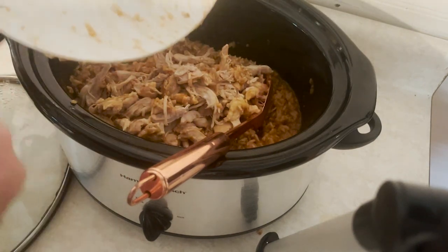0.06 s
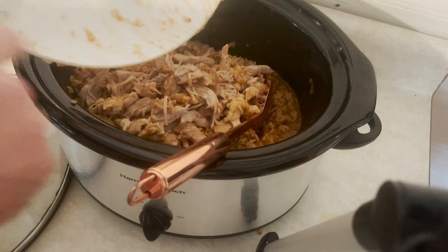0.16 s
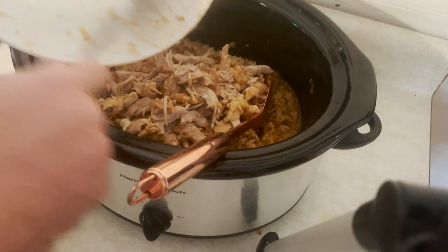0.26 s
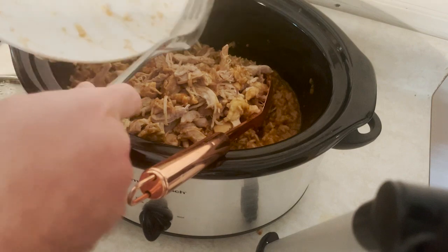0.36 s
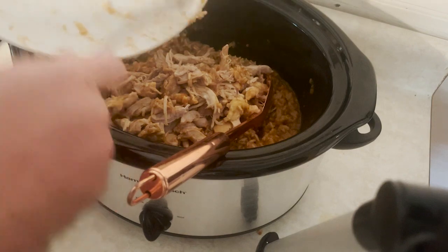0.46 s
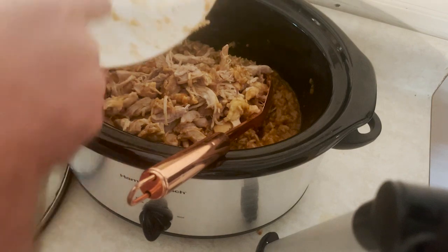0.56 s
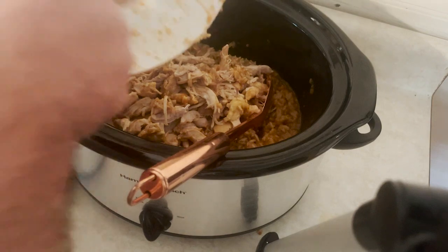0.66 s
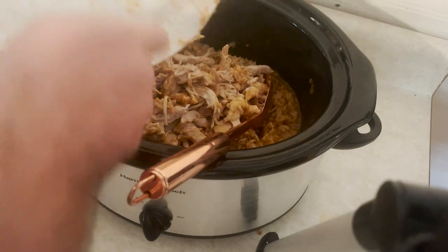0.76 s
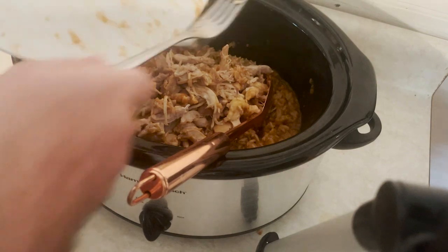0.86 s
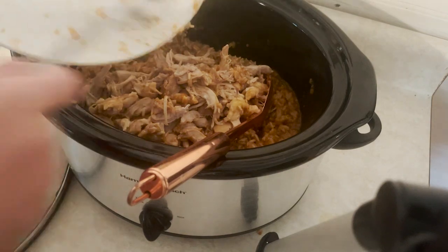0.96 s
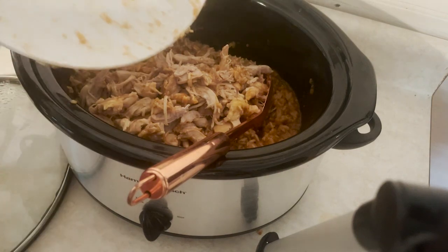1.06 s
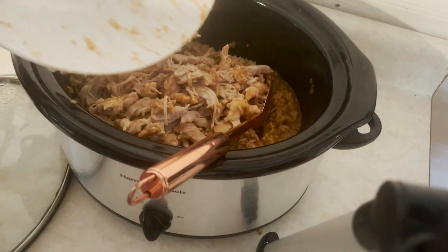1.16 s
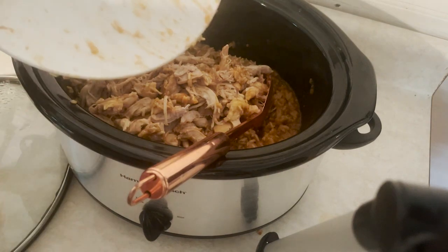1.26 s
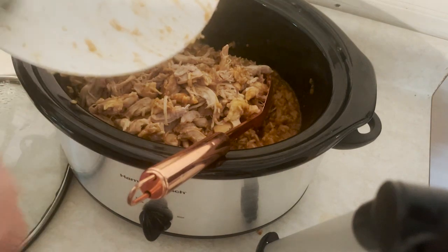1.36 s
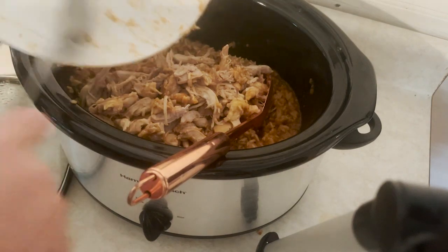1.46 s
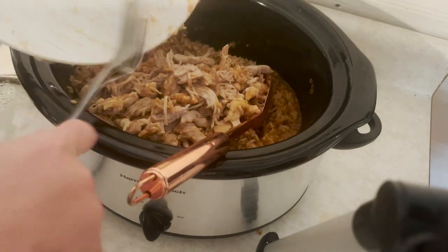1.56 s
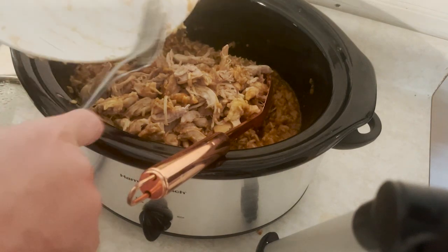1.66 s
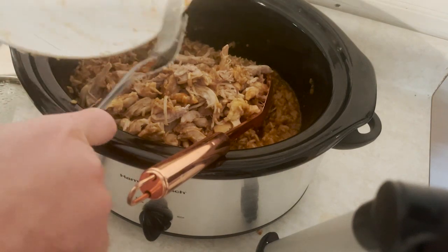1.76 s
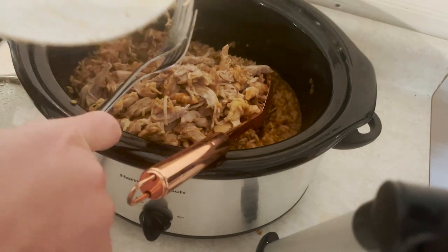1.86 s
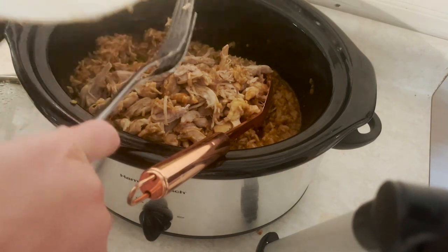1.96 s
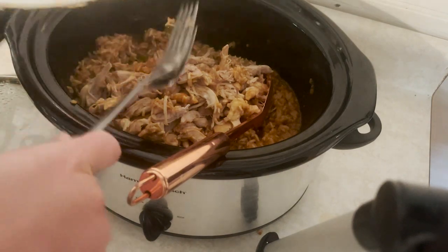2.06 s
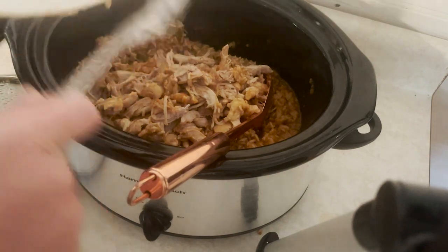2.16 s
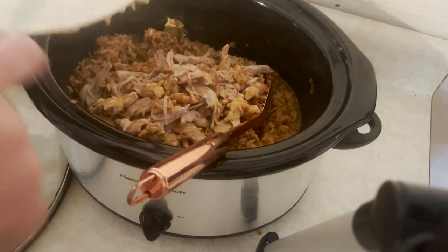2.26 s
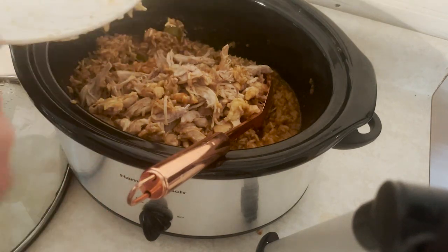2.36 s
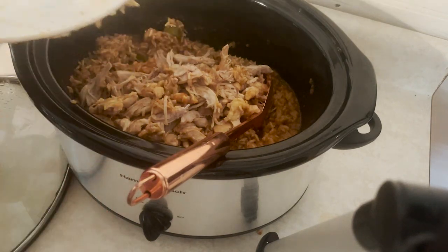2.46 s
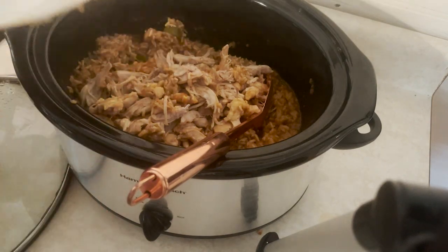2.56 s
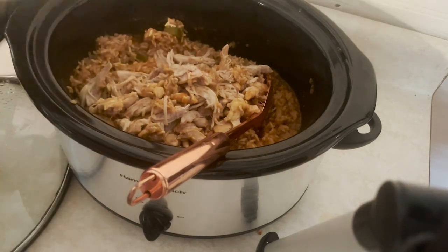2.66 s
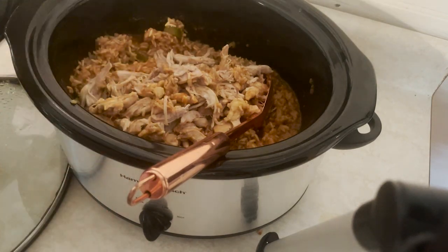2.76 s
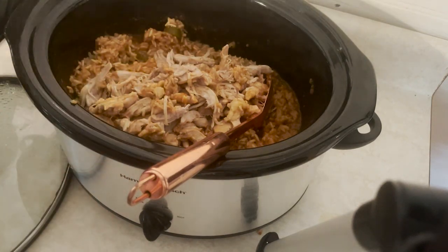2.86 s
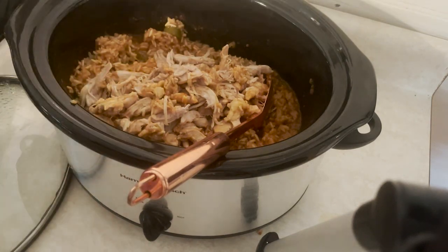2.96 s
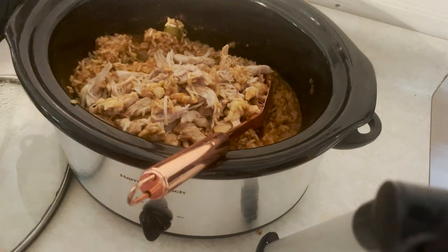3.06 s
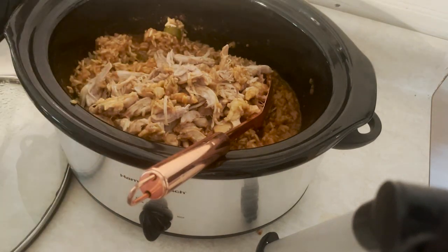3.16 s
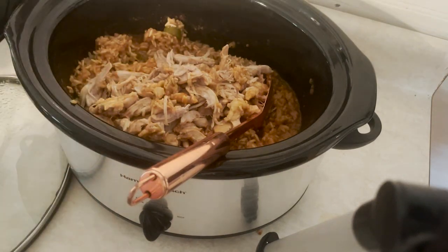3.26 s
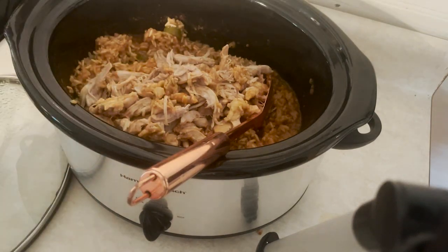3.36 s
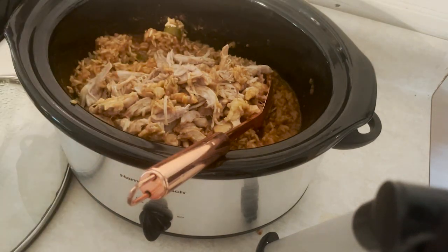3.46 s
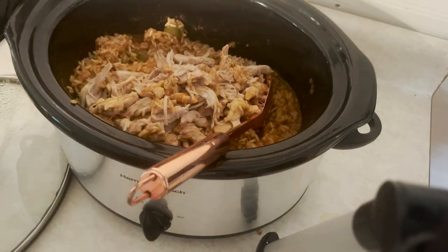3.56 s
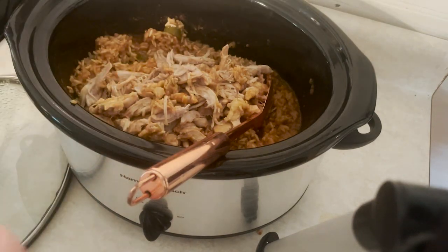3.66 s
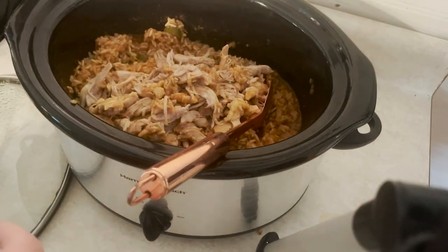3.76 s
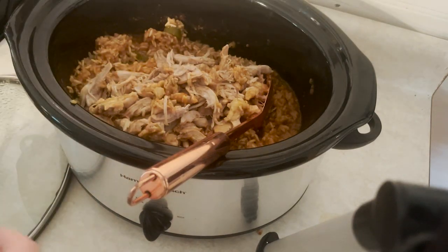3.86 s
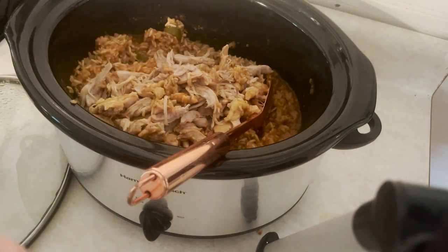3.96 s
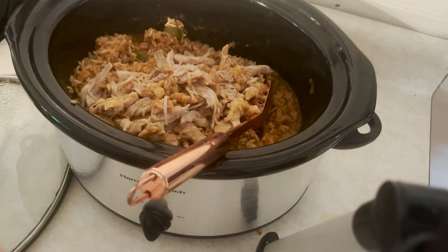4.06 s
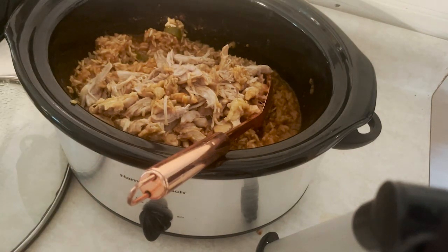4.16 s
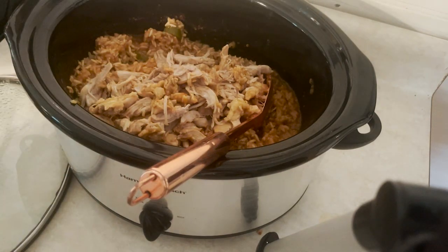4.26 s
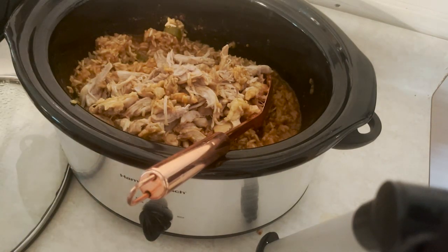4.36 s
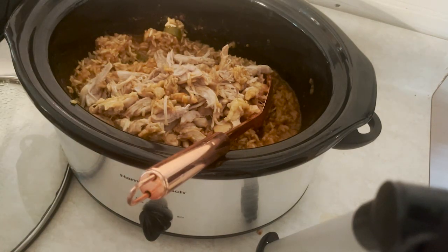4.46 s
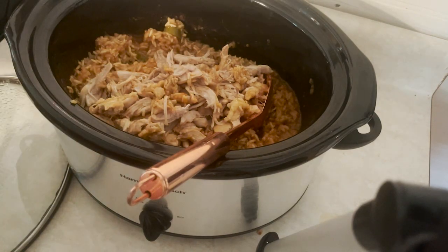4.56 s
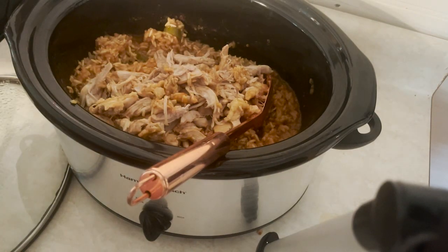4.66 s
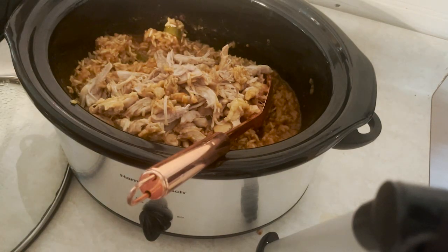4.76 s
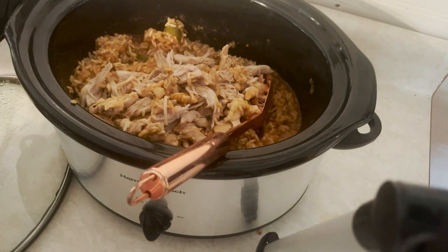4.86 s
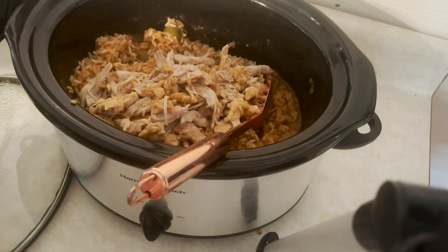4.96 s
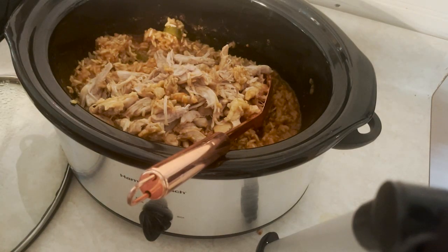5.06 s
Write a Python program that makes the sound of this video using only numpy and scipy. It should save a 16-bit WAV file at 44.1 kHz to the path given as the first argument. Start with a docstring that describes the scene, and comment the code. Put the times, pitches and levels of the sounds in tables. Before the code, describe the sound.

Close stereo pickup in a hard-walled kitchen: a metal spoon strikes and scrapes a ceramic plate in sharp, quickly damped clinks, busiest in the first two seconds, with faint squeaks near two seconds. A few more firm clinks follow around three seconds, then only light, dull ticks and soft rubbing toward the end. A low appliance hum and faint room air continue throughout.

```python
"""Sharp ceramic clinks come first: a steel spoon taps, bounces and scrapes on a hand-held plate in a kitchen.
Each tap or slide is shaped noise that sets families of ringing plate tones going, chosen by the spot touched.
A few faint squeaks are gliding tones, and the hard room answers with short tails of dying noise.
Behind it all, filtered noise makes an appliance's hum, room air and a low rumble.
Two microphone ports hear the plate with different loudness and timing."""
import sys
import numpy as np
from scipy import signal
from scipy.fft import rfft, irfft, next_fast_len
from scipy.io import wavfile
from scipy.ndimage import map_coordinates

SR = 44100
rng = np.random.default_rng(int(sys.argv[2]) if len(sys.argv) > 2 else 0)


def store_pcm(level_fs):
    """Save levels as 16-bit WAV."""
    pcm = np.round(np.clip(level_fs, -1, 1) * 32767).astype(np.int16)
    wavfile.write(sys.argv[1], SR, np.atleast_2d(pcm).T)


N = 225473


def amp(db):
    """Turn decibels into a gain."""
    return 10 ** (np.asarray(db) / 20)


def unit(x):
    """Scale to an average strength (rms) of 1."""
    return x / np.sqrt(np.mean(np.abs(x) ** 2) + 1e-30)


def along(points, hz):
    """Read a value at any pitch from (pitch, value) points, spacing pitch by ratio as the ear does."""
    point_hz, value = np.transpose(points)
    return np.interp(np.log(hz + 1), np.log(point_hz + 1), value)


def filtered(x, response):
    """Filter a sound by multiplying its spectrum by a response to each frequency."""
    size = next_fast_len(N + SR // 2)
    hz = np.fft.rfftfreq(size, 1 / SR)
    return irfft(rfft(x, size) * response(hz), size)[..., :N]


def wobble(rate):
    """A smooth random curve through `rate` random points a second."""
    knots = rng.standard_normal(int(N * rate / SR) + 4)
    return map_coordinates(knots, [np.arange(N) * rate / SR])


# Plate tones in eight families, low to high; the shortest-lived are the dull noise of contact.
# Columns: pitch_hz, level_db (within the family), t60_s (time to fade by 60 dB, before added damping)
PLATE_FAMILIES = [
    [(352, 1, 0.026), (143.6, -10.5, 0.044)],
    [(623, -3.5, 0.017), (843, 1, 0.025), (1169, -0.5, 0.021)],
    [(1564, 2, 0.21), (1522, -1, 0.058), (1511, -8.5, 0.23), (1923, -8, 0.044), (1600, 3, 0.0011)],
    [(2403, 6, 0.082), (2371, -3, 0.14), (2419, 5, 0.053), (2035, -9, .04), (2628, -10, 0.21),
     (2189, -0.5, 0.0069)],
    [(3460.4, 4.5, 0.04), (3560, -4.5, 0.1), (3204, -7.5, 0.042), (4060, -9, 0.056), (4620, -7.5, 0.073),
     (3683, 5.5, 0.012)],
    [(4503, 9, 0.047), (4670, 2.5, 0.033), (4878, 8, 0.052), (4740, 8.5, 0.006)],
    [(5090, -4.5, 0.028), (5590, 2.5, 0.022), (6580, -6, 0.071), (6304, -1, 0.048), (6957, -6.5, 0.055),
     (8075, 5, 0.031), (7180, -2, 0.015), (6080, 6.5, 0.005)],
    [(9544, 2.5, 0.01), (10180, -1, 0.011), (10380, -13.5, 0.086), (11303, 0, 0.024), (12070, -7, 0.026),
     (13300, -0.5, 0.017), (14700, 5, 0.0056), (16843, 3.5, 0.005), (10660, 16, 0.0015),
     (14500, 12.5, 0.0017)],
]


def ringing(hz, damping=1):
    """Each family is a sum of fading tones, scaled to energy 1; damping (1 / s) adds to each 1 / t60."""
    s = 2j * np.pi * hz

    def mode(centre_hz, level_db, t60_s):
        decay = np.log(1000) * (1 / t60_s + damping)
        return amp(level_db) * s / ((s + decay) ** 2 + (2 * np.pi * centre_hz) ** 2)

    families = []
    for family in PLATE_FAMILIES:
        # neighbouring tones start in opposite directions
        tones = [(-1) ** k * mode(*row) for k, row in enumerate(family)]
        families.append(unit(sum(tones)))
    return np.array(families)


# How strongly each spot drives the families; rows are spots evenly spaced over 0-1.
# Columns: family_1_db to family_8_db, low to high
SPOT_LEVELS = [(-2.5, -3.5, -7.5, -7, -23.5, -11, 4.5, 2.1), (-1.3, -7, -15.5, 2.5, -10, 1.5, -3, -5.5),
               (-4.5, 5, 0.8, 1.7, -1.7, 0.4, -2, -5), (-14, 1.5, -2, -16, 5.5, -4, 3.2, -7)]


def drive(level_db, thud_db, spot, hardness_db):
    """The touched spot favours some families; thud lifts the lowest two, hardness the top three in steps."""
    spot_places = np.linspace(0, 1, len(SPOT_LEVELS))
    gain_db = []
    for k, family_db in enumerate(np.transpose(SPOT_LEVELS)):
        spot_db = np.interp(spot, spot_places, family_db)
        gain_db.append(level_db + spot_db + thud_db * (k < 2) + hardness_db * max(k - 4, 0))
    return amp(gain_db)


# Single touches of the spoon.
# Columns: start_s, level_db (before the overall force), thud_db (added to the two lowest families),
# spot (0-1), hardness_db (per family above the fifth), chatter_s (time for the contact noise to die down)
SPOON_TAPS = [(0.0495, -13, -8.5, 0.62, 1.58, .0059), (0.11, -29, -29, 1, -1.5, .0038),
              (0.1617, -26, -19, .3, 2, 0.0026), (0.2452, -26.5, -8.5, 0.56, 3.4, .0023),
              (0.2506, -15, -14.5, 0.43, 1.04, .0021), (0.5234, -17.5, -6.5, 0.31, -1, .004),
              (0.5346, -11.5, -13, 0.01, -3.86, .0042), (0.6387, -39.5, -9, 0, 4.5, .0039),
              (0.737, -44, -2.5, 0, 2.6, .0017), (1.1027, -25, -2.5, 0.19, 2.5, .0028),
              (1.1733, -36, -13, 0.5, -4, 0.0033), (1.204, -33.5, -28, 0.2, 5, .0017),
              (1.217, -25.5, -29.5, 0.15, 2, .0075), (1.2322, -29, -4.5, 0.58, 3, .0073),
              (1.6435, -10.5, -7, 0.67, 1.2, .0046), (1.8469, -37, 0.5, 0.67, 4.5, .0017),
              (1.8952, -44.5, 0, 0.67, 7, .0026), (1.934, -35, -22.5, 0.4, 1.7, .005),
              (1.9677, -22, -21, 0.8, 1.5, .005), (1.983, -21, -0.5, 1, -1.5, .0037),
              (1.9944, -21, -10, 0.56, 1.6, .0095), (2.0726, -37.5, -10.5, .65, -9, 0.0045),
              (2.116, -34, -9, 0.2, -4, .005), (2.1352, -27.5, -11, 0.34, -0.5, .013),
              (2.2397, -16, -13.5, 0.84, 3, .0043), (2.9388, -19, -15, 0.68, 1.6, .0042),
              (3.19, -14.5, -18.5, 0.67, -3, 0.005), (3.2098, -28.5, -19.5, 0.99, -1.5, .0055),
              (3.22, -30, -34, 0.93, -3.5, .0035), (3.2417, -27, -4.5, 0.47, -5.5, .008),
              (3.2482, -31, -23, 0.8, -1, .0086), (3.6261, -44, -30, 1, -0.5, .012),
              (3.6413, -40.5, -16, 0.7, -5, 0.0041), (4.066, -50.5, -9.5, 0.66, 1, .0062),
              (4.36, -43, -10, 0.7, -6, .006), (4.3918, -37, -31, 0.37, -6, .0041),
              (4.4614, -34.5, -12, .35, -3, .0056), (4.4875, -39.5, -21, 0.6, -2.5, 0.0042),
              (4.537, -30.5, -17, 0.24, -4.5, .015), (4.561, -27, -15, .35, -10, .0043),
              (4.592, -38, -25, 0.3, -4, 0.0081), (4.61, -32, -30, 0.32, -3.5, .0031),
              (4.6297, -32, -38, 0.62, -2, .0061)]


def taps(force_db):
    """Each contact is a brief burst of chatter that drives the families its spot favours."""
    force = np.zeros((len(PLATE_FAMILIES), N + SR))
    t = np.arange(SR // 10) / SR
    uptake = np.abs(ringing(np.fft.rfftfreq(len(t), 1 / SR))) ** 2
    for start_s, *contact, chatter_s in SPOON_TAPS:
        rise = 1 - np.exp(-t / 0.0012)
        shape = rise * np.exp(-t / max(chatter_s, .0005))
        chatter = shape * rng.standard_normal((len(PLATE_FAMILIES), len(t)))
        # make every family ring with equal energy before the spot sets their balance
        energy = np.mean(uptake * np.abs(rfft(chatter)) ** 2, axis=1, keepdims=True)
        chatter /= np.sqrt(energy)
        place = force[:, round(start_s * SR):][:, :len(t)]
        place += amp(force_db) * drive(*contact)[:, None] * chatter
    return force[:, :N]


# Slides of the spoon. Columns: thud_db (added to the second family; slides leave the lowest one still),
# hardness_db (per family above the fifth), then a curve of time_s, pressure_db (before the overall force), spot
# (0-1)
SPOON_STROKES = [(-12.5, 0, [(.07, -20.5, 0.88), (.146, -57.5, 0.04), (.164, -29, 0), (.194, -37, 0.86),
                 (.23, -32, 0.7)]), (-6.5, -4, [(.56, -39, 0.52), (.624, -45.5, .5), (.674, -38.5, 0.1),
                 (.736, -43.5, .35), (.79, -78, 1)]), (-16, -3.9, [(1.12, -43, 0), (1.182, -41, 0.2),
                 (1.2, -39, 0), (1.214, -18.5, 0.11), (1.24, -24.5, 0.39), (1.28, -38.5, 0.95)]),
                 (-12, -0.64, [(1.84, -35, 0.65), (1.858, -36, 0.45), (1.902, -43.5, 0.82),
                 (1.935, -34.5, 0.63), (1.99, -22.5, 0.46), (2.038, -40.5, 0.82), (2.075, -33.5, 0.62),
                 (2.126, -33, 0.63), (2.19, -43.5, 0.17), (2.23, -35, 0.34)]),
                 (-14.5, -3.5, [(3.195, -13.5, 0.25), (3.221, -12.5, 0.23), (3.232, -19.5, 0.58),
                 (3.244, -19, 0.32), (3.264, -23, 0.53), (3.275, -39, 0.5), (3.31, -32, .6)]),
                 (-19.5, -3.5, [(3.54, -59, 0.7), (3.594, -52.5, 0.66), (3.65, -42.5, 0.85),
                 (3.686, -50.5, 0.54), (3.806, -55.5, 0.73), (3.83, -83, 0.4)]),
                 (-20, -3.5, [(4.055, -70, .6), (4.067, -51.5, 0.49), (4.095, -59.5, 0.64),
                 (4.155, -51.5, 0.5), (4.18, -58.5, 0.68), (4.27, -53, 0.56), (4.32, -50, 0.53),
                 (4.35, -56.5, 0.85), (4.4, -43.5, 0.37), (4.445, -46.5, 0.5), (4.484, -36.5, 0.43),
                 (4.514, -46, 0.52), (4.56, -32.5, 0.23), (4.6, -42.5, 0.64), (4.63, -39, 0.42),
                 (4.688, -42.5, 0.78), (4.78, -63, 0.33)])]


def strokes(force_db, grit_db, stutter_db, flicker_db, slips_per_s, stutters_per_s):
    """The edge catches on the glaze in clumps of uneven slips, too light to knock the lowest family."""
    t = np.arange(N) / SR
    pressure = np.zeros((len(PLATE_FAMILIES), N))
    for thud_db, hardness_db, curve in SPOON_STROKES:
        time_s, level_db, spot = np.transpose(curve)
        on = (t > time_s[0]) & (t < time_s[-1])
        fade_in = (t[on] - time_s[0]) / 0.0014
        fade_out = (time_s[-1] - t[on]) / 0.031
        fade = np.clip(np.minimum(fade_in, fade_out), 0, 1)
        level_now = np.interp(t[on], time_s, level_db)
        spot_now = np.interp(t[on], time_s, spot)
        gain = drive(level_now, thud_db, spot_now, hardness_db)
        pressure[1:, on] += fade * gain[1:]
    # the moving contact point favours one family, then another
    flicker = np.array([wobble(40) for _ in PLATE_FAMILIES])
    grit = np.tanh(wobble(slips_per_s))
    slips = amp(grit_db * grit + stutter_db * wobble(stutters_per_s) + flicker_db * flicker)
    noise = rng.standard_normal((len(PLATE_FAMILIES), N))
    return amp(force_db) * pressure * unit(slips) * noise


# Faint squeaks of the spoon's edge on the glaze.
# Columns: start_s, end_s, start_pitch_hz, end_pitch_hz, level_db (around which it wavers)
GLAZE_SQUEAKS = [(1.845, 1.9, 1090, 1105, -48), (1.965, 2.024, 856, 950, -37.5),
                 (2.067, 2.163, 796, 1150, -43.5)]
SQUEAK_FADE = 0.19  # share of a squeak spent swelling, and again dying


def squeaks():
    """Regular sticking and slipping makes a gliding, unsteady tone with a weak overtone an octave up."""
    t, out = np.arange(N) / SR, np.zeros(N)
    for start_s, end_s, from_hz, to_hz, level_db in GLAZE_SQUEAKS:
        progress = np.clip((t - start_s) / (end_s - start_s), 0, 1)
        glide_hz = from_hz + (to_hz - from_hz) * progress
        pitch_hz = glide_hz * (1 + 0.069 * wobble(100))
        phase = 2 * np.pi * np.cumsum(pitch_hz) / SR
        tone = np.sin(phase) + amp(-12.5) * np.sin(2 * phase)
        fade = np.clip(np.minimum(progress, 1 - progress) / SQUEAK_FADE, 0, 1) ** 2
        out += fade * amp(level_db + 2.5 * wobble(47)) * tone
    return out


# Fingers under the plate free or hold back its deep knock and two main tones.
# Columns: time_s, first_family_db, third_family_db, fourth_family_db
FINGER_GRIP = [(.05, 3, 1.1, 1.1), (.2, -4.5, 4, -1), (.3, -7.5, 0, -7), (.52, 1, -7.5, -6),
               (.8, -4, -1, 2), (1.1, 3, 6.4, -4), (1.25, -1.5, -6, -4.1), (1.65, -3.5, -1.5, -1),
               (1.9, -4, 6, -7), (2.1, -5, 0, -6.5), (2.24, 4.5, -1, -0.5), (2.94, 1, 1, 3.5),
               (3.2, 0, -3, -9.4), (3.65, 4.5, 8, -1.5), (3.75, -4, -2, 7.5), (4.1, -1.7, 1, -2.5),
               (4.55, -4, -2, -2.5), (4.75, -2.5, -20.5, 5.5)]


def grip():
    """The holding fingers smoothly raise or lower three families over time."""
    time_s, *levels_db = np.transpose(FINGER_GRIP)
    t = np.arange(N) / SR
    gain = np.ones((len(PLATE_FAMILIES), N))
    gain[[0, 2, 3]] = amp([np.interp(t, time_s, level_db) for level_db in levels_db])
    return gain


def sway(turn_rad, per_s):
    """The tilting plate aims each family now at one port, now at the other; the top two stay put."""
    turn = turn_rad * np.array([wobble(per_s) * (k < 6) for k in range(len(PLATE_FAMILIES))])
    return np.array([np.cos(turn) + np.sin(turn), np.cos(turn) - np.sin(turn)])


AWAY_S, AWAY_HZ, AWAY_DB = 2.6, 12500, -14  # from this time, treble around and above this pitch is weaker


def treble_fades(plate):
    """From AWAY_S on, the top treble grows fainter, down to AWAY_DB."""
    def duller(hz):
        steep = (hz / AWAY_HZ) ** 8
        return (1 + amp(AWAY_DB) * steep) / (1 + steep)

    return np.where(np.arange(N) / SR < AWAY_S, plate, filtered(plate, duller))


# How long the kitchen's echo lasts. Columns: pitch_hz, t60_s (time to fade by 60 dB)
KITCHEN_FADE = [(300, 0.13), (1500, 0.51), (5000, 0.56), (10000, 0.38), (16000, 0.35)]


def kitchen(x, block_s):
    """Wall echoes are noise dying at each pitch's own speed, new for each block as the plate moves."""
    step = round(block_s * SR)
    out = np.zeros((2, N + step + SR))
    for start in range(0, N, step):
        noise = rng.standard_normal((2, SR // 2))
        hz, t, spectrum = signal.stft(noise, SR, nperseg=256)
        fade = amp(-60 * t / along(KITCHEN_FADE, hz)[:, None])
        tail = signal.istft(spectrum * fade, SR, nperseg=256)[1]
        tail /= np.linalg.norm(tail[0])
        wet = signal.fftconvolve(x[None, start:start + step], tail, axes=1)
        out[:, start + 200:][:, :wet.shape[1]] += wet  # the walls answer 200 samples late
    return out[:, :N]


# How much of the echo differs between the ports. Columns: pitch_hz, share (relative to the common echo)
ECHO_SPREAD = [(300, 0.13), (2500, 0.31), (5000, 0.2), (7500, 0.044), (15000, 0.033)]


def walls(plate):
    """The room gives both ports a common echo, plus a part that is opposite in the two."""
    shared, apart = kitchen(plate.mean(axis=0), block_s=.15)
    apart = filtered(apart, lambda hz: along(ECHO_SPREAD, hz))
    return amp(-10) * (shared + np.array([apart, -apart]))


# Timing at the two microphone ports. Columns: pitch_hz, left_lead_rad
PORT_LEAD = [(0, 0), (1000, .8), (1500, 1.2), (4200, .4), (5000, .8), (6900, -1.2), (7700, -2.9),
             (8900, -3.4), (10700, -6), (12500, -6.6), (13900, -9.2), (15000, -9.5), (16900, -11)]
# Loudness at the two microphone ports. Columns: pitch_hz, left_minus_right_db
PORT_LEVEL = [(200, 0), (400, 3), (1300, 5.5), (2400, 6), (5000, 5), (7500, 0), (15000, 0)]


def ports(hz):
    """Each port hears the plate and its echo at its own level and moment; half the contrast goes to each."""
    half_level = np.log(amp(along(PORT_LEVEL, hz) / 2))
    half_lead = np.interp(hz, *np.transpose(PORT_LEAD)) / 2
    half = half_level + 1j * half_lead
    return np.exp([half, -half])


# How alike the background is at left and right. Columns: pitch_hz, likeness (1 = identical)
SIDES_ALIKE = [(60, 0.9), (130, .9), (290, 0.64), (640, 0.3), (1400, 0.04)]


def pair(response):
    """Mix shared and opposite noise into left and right with a given colour, likeness and rms 1."""
    def mid_and_side(hz):
        turn = np.arccos(np.clip(along(SIDES_ALIKE, hz), -1, 1)) / 2
        return response(hz) * np.array([np.cos(turn), np.sin(turn)])

    mid, side = filtered(rng.standard_normal((2, N)), mid_and_side)
    return unit(np.array([mid + side, mid - side]))


def narrow(centre_hz, width_hz):
    """A filter that keeps noise near one pitch, so it hums."""
    return lambda hz: 1 / (1 + (2 * (hz - centre_hz) / width_hz) ** 2)


# The appliance's wavering hum, one line per row.
# Columns: pitch_hz, width_hz, level_db (before the left-right balance)
APPLIANCE_HUM = [(59, 9.9, -65.5), (117, 4.9, -64.5), (171, 8.1, -59), (202.2, 6, -61), (226.9, 4, -61),
                 (300, 8, -77), (336.4, 6.7, -70.5)]


def hum():
    """An appliance hums: narrow bands of noise sound like wavering low tones."""
    return sum(amp(level_db) * pair(narrow(pitch_hz, width_hz))
               for pitch_hz, width_hz, level_db in APPLIANCE_HUM)


# Colour of the steady room noise. Columns: pitch_hz, density_db (relative)
AIR_COLOUR = [(25, -7.5), (80, -3.5), (130, -12), (220, -13.5), (460, -15.5), (800, -29), (1500, -34),
              (3000, -35), (6000, -43), (12000, -50), (15000, -77.5)]


def room_air():
    """Room air is steady noise, strongest in the bass."""
    return amp(-57.5) * pair(lambda hz: amp(along(AIR_COLOUR, hz)))


# Swells of the low rumble.
# Columns: time_s, level_db (before the left-right balance), half_length_s
RUMBLE_SWELLS = [(0.579, -61, 0.32), (1.59, -58, .07), (2.141, -51.5, 0.14), (3.906, -49.5, 0.094),
                 (5.11, -56.5, 0.068)]
RUMBLE_DB, RUMBLE_WAVER_DB = -62, 1.2  # level between the swells, and depth of its wavering


def rumble():
    """Low noise around 60 Hz wavers gently and rises in rounded swells."""
    t = np.arange(N) / SR
    level = amp(RUMBLE_DB + RUMBLE_WAVER_DB * wobble(1.7))
    for time_s, level_db, half_length_s in RUMBLE_SWELLS:
        level = level + amp(level_db) * np.exp(-((t - time_s) / half_length_s) ** 2)
    return level * pair(narrow(60, 36))


def background():
    """Hum, air and rumble together, slightly louder on the left."""
    return (hum() + room_air() + rumble()) * amp([[.45], [-.45]])


PRESSED = 16  # damping while the spoon presses on the glaze (1 / s, added to each 1 / t60)


def scene():
    """The plate, direct and from the walls, over the background; taps in a slide ring as damped as it does."""
    blows = taps(force_db=17)
    rub = strokes(force_db=-7, grit_db=1.0, stutter_db=2.0, flicker_db=0.5, slips_per_s=360, stutters_per_s=76)
    sliding = rub[-1] != 0
    hold = grip()
    struck = filtered(hold * blows * ~sliding, ringing)
    rubbed = filtered(hold * (rub + blows * sliding), lambda hz: ringing(hz, damping=PRESSED))
    swayed = (struck + rubbed) * sway(turn_rad=0.4, per_s=14)
    plate = treble_fades(swayed.sum(axis=1) + squeaks())
    return filtered(plate + walls(plate), ports) + background()


BASS_CUT_HZ, TOP_HZ = 38, 16400  # the deepest bass and the highest treble fade beyond these


def record(dry):
    """The microphone rounds the highest peaks, loses the deepest bass and cuts steeply above its top limit."""
    rounded = dry / (1 + np.abs(dry / .95) ** 4) ** (1 / 4)

    def microphone(hz):
        bass = (1j * hz / (BASS_CUT_HZ + 1j * hz)) ** 3
        return bass / (1 + (hz / TOP_HZ) ** 60)

    return filtered(rounded, microphone)


dry = scene()
out = record(dry)
store_pcm(out)
```